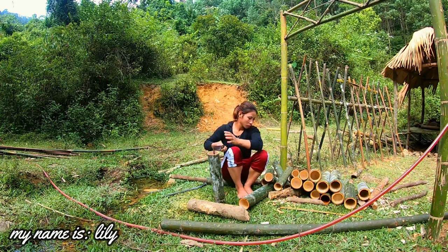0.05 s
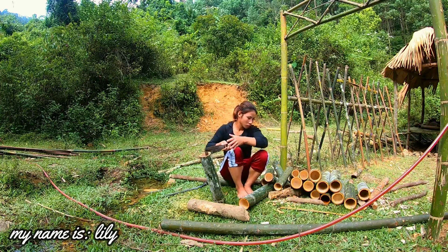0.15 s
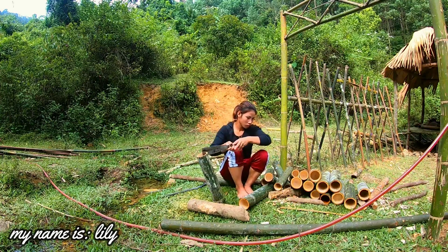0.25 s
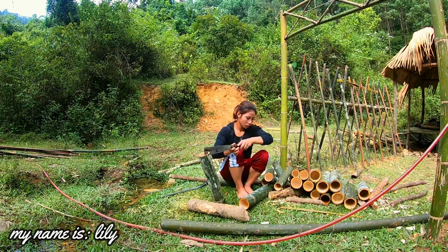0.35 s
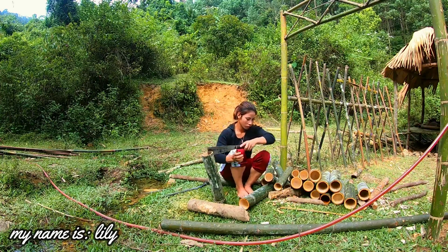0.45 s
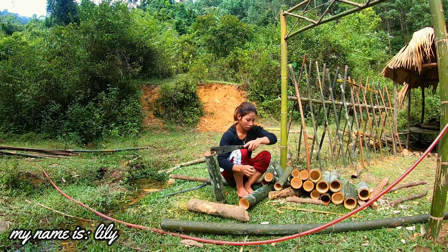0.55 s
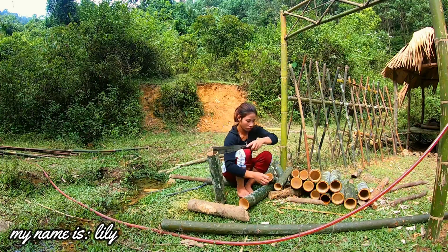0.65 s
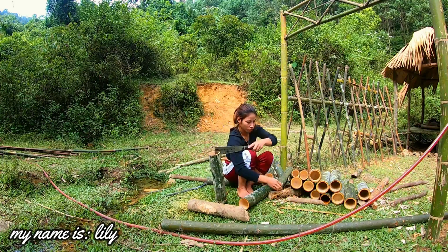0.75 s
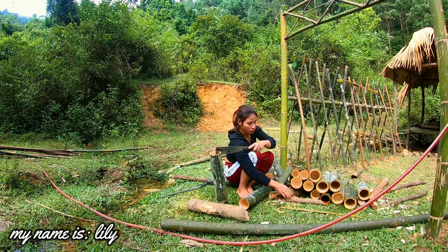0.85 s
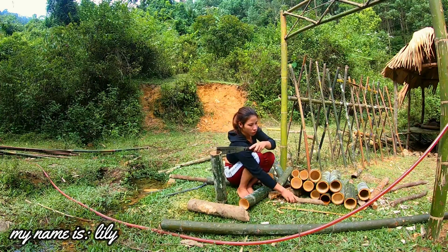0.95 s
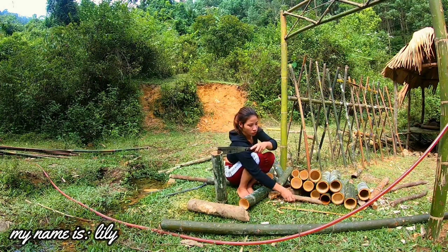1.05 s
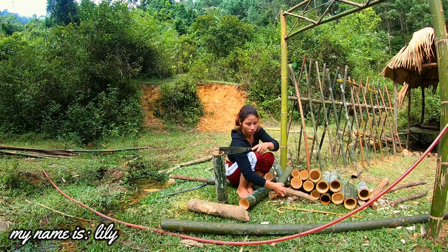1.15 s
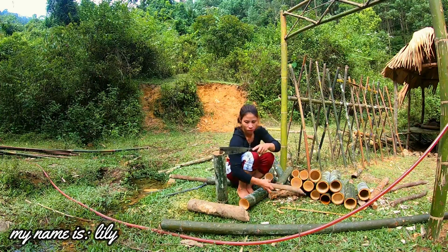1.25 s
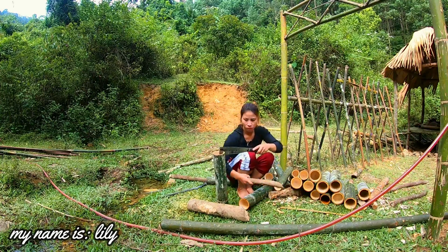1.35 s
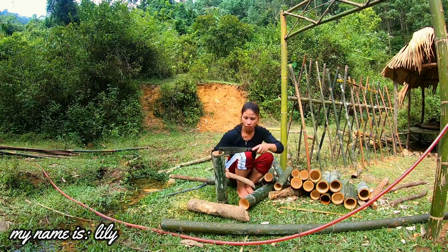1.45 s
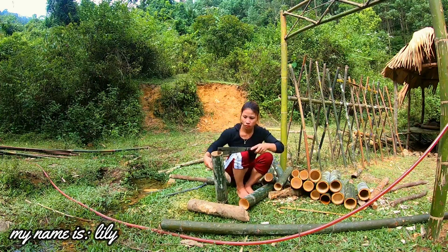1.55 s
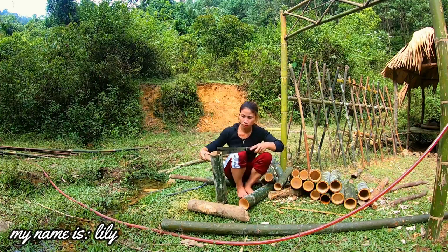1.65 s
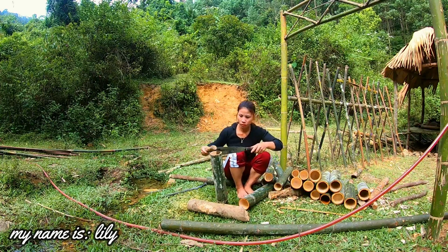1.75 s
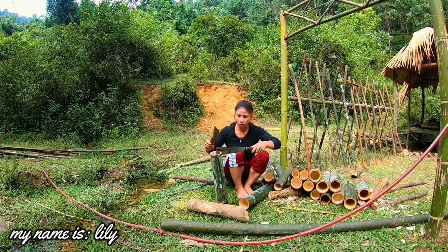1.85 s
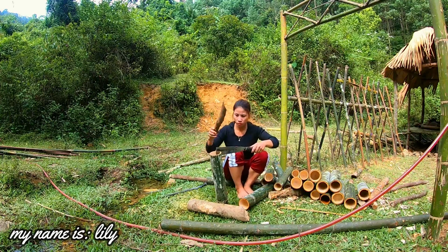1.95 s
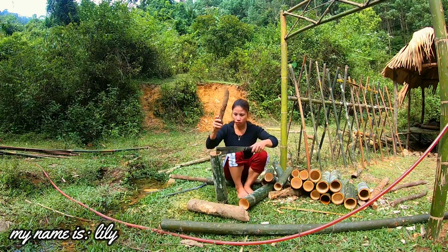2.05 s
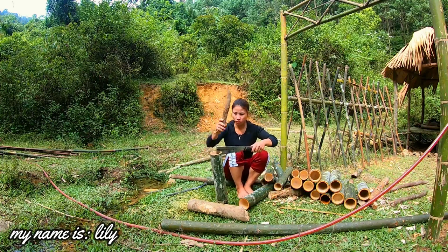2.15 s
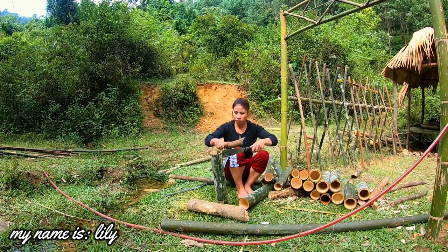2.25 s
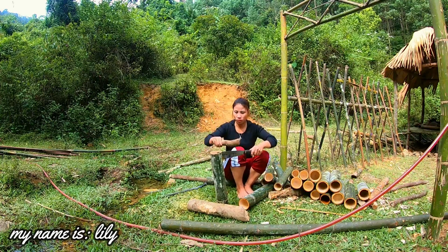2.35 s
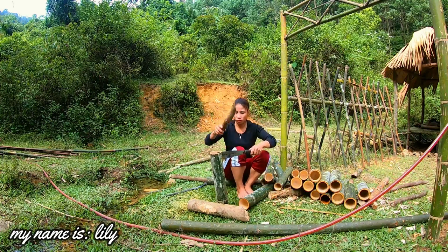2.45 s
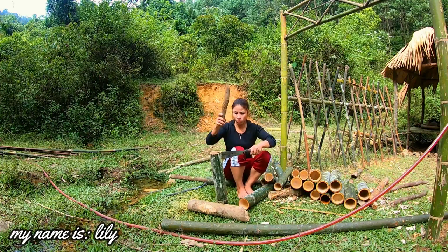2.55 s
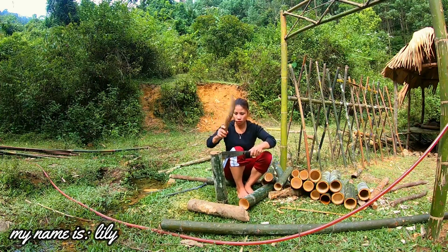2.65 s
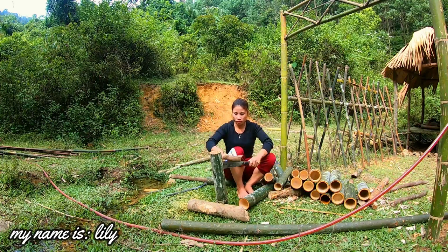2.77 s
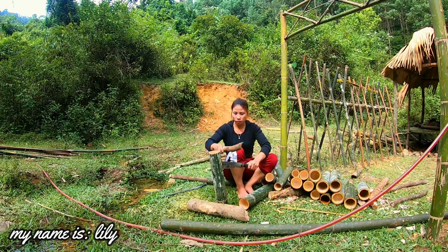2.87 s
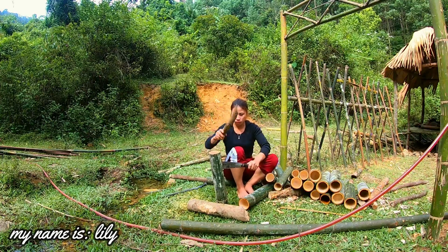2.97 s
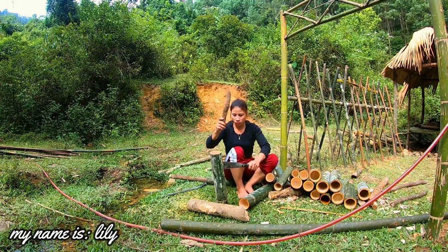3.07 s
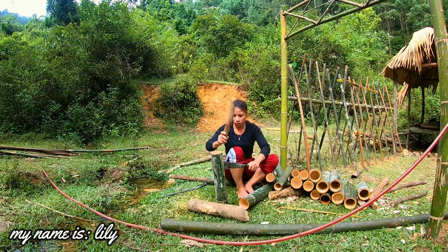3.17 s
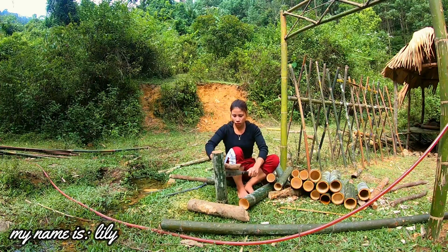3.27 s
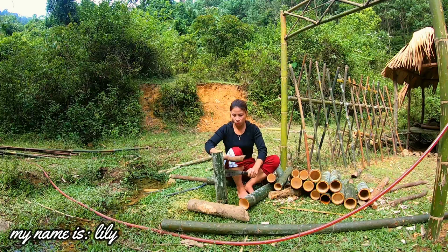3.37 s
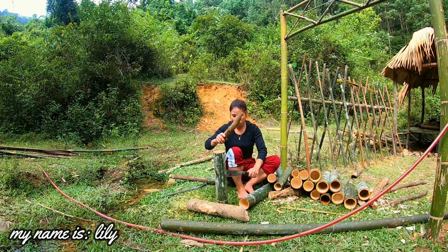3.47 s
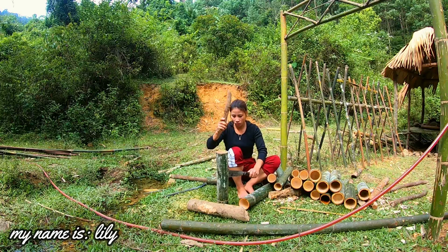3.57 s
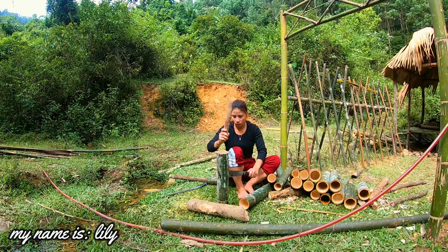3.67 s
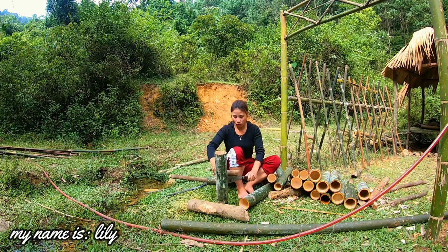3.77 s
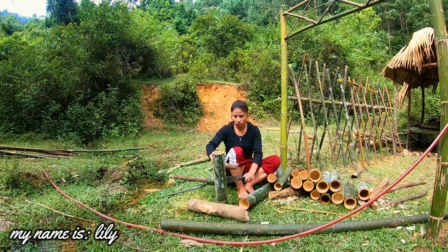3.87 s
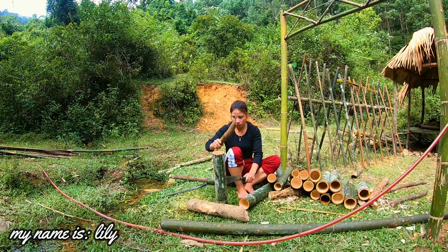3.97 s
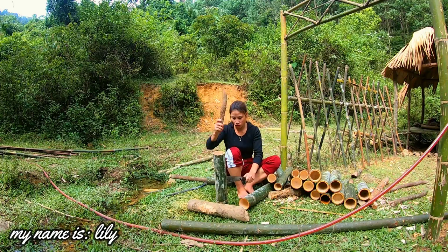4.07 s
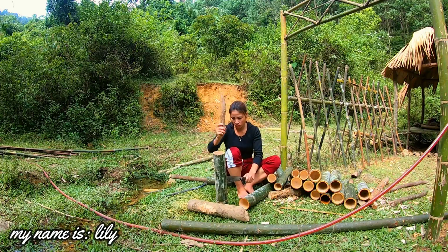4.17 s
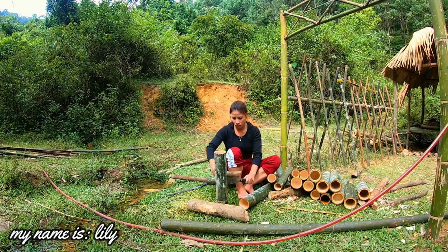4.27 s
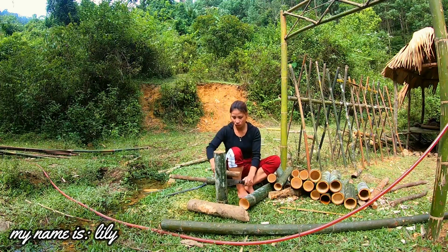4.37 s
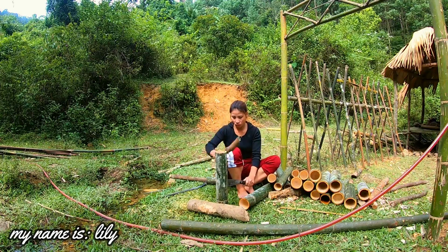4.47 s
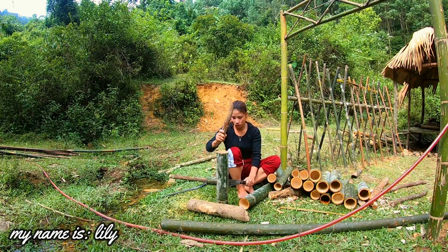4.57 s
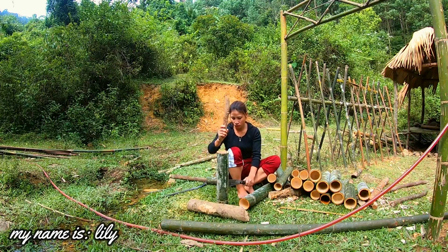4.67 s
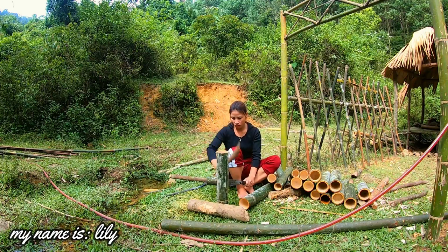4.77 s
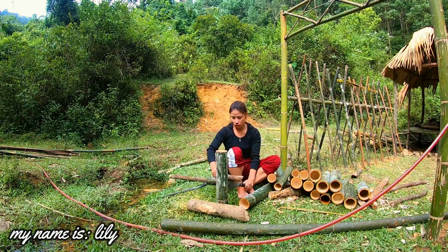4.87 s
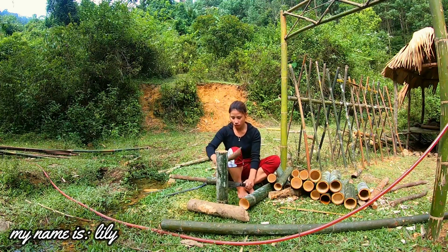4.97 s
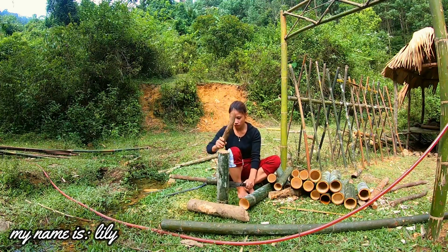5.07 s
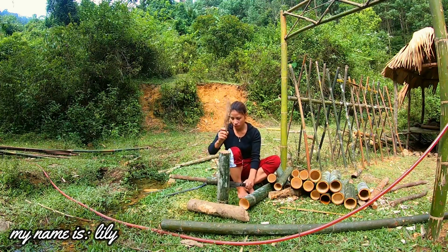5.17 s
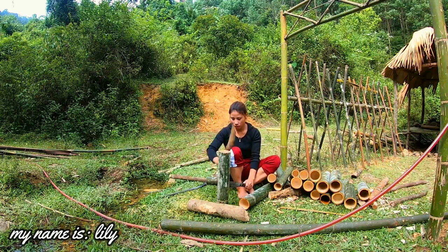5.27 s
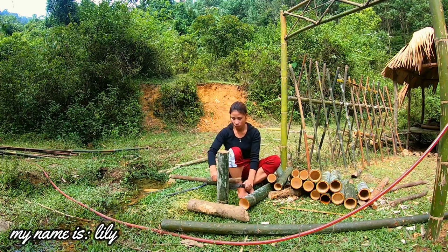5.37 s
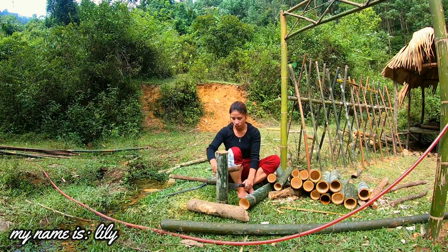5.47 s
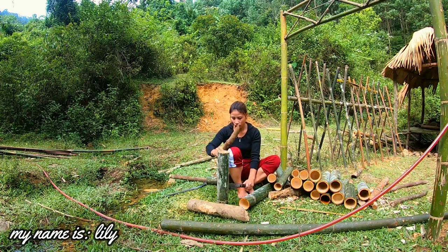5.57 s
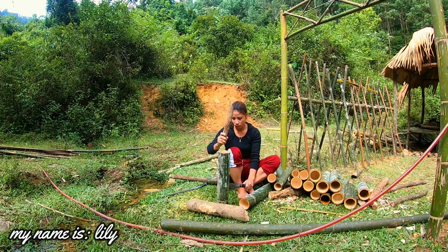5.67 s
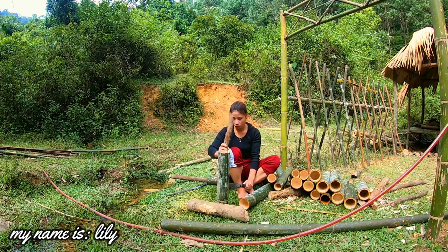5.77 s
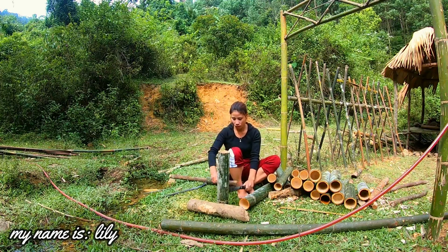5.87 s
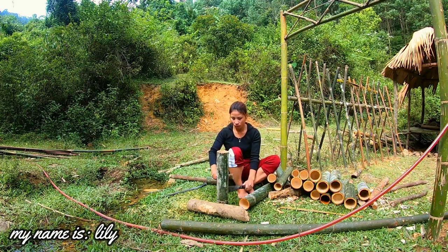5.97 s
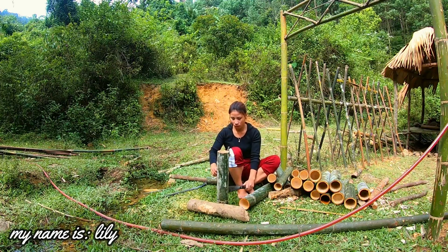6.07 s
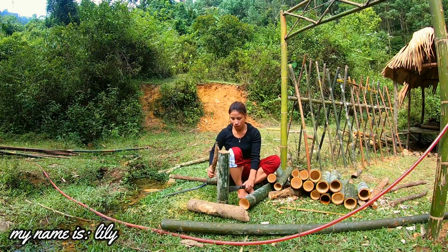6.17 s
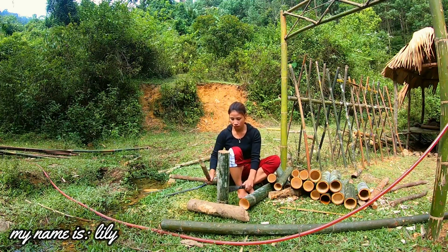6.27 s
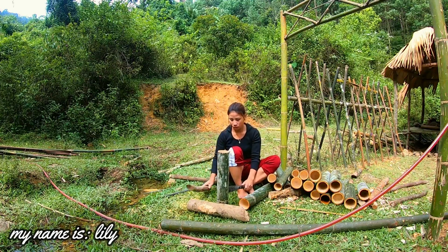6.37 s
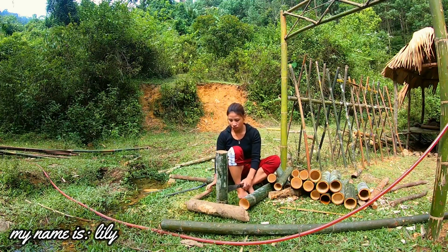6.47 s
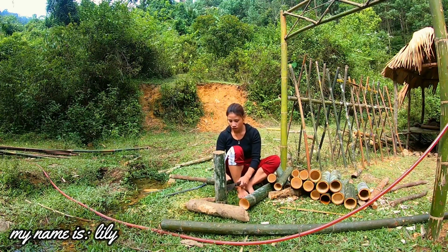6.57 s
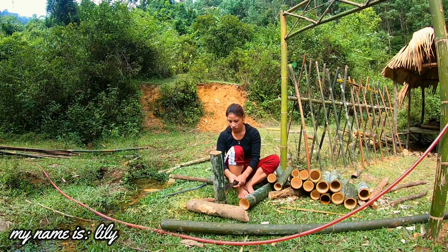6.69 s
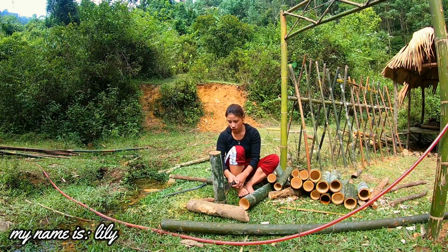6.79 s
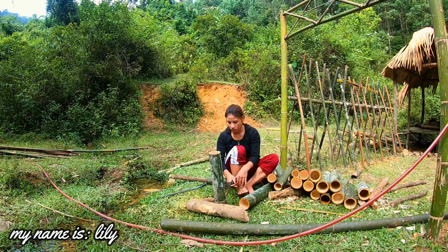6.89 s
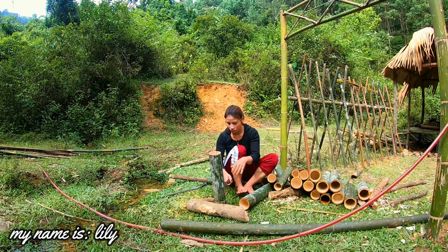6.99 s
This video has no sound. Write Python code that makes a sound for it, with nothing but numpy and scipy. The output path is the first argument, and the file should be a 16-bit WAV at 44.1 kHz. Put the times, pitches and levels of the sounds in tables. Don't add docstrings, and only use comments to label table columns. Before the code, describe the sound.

After two seconds of gurgling water and cricket trill, eight evenly spaced woody whacks split a bamboo tube in a clearing.

```python
import sys
import numpy as np
from scipy import signal
from scipy.io import wavfile
from scipy.ndimage import uniform_filter1d

SR = 44100
rng = np.random.default_rng(int(sys.argv[2]) if len(sys.argv) > 2 else 0)


def generate_wav(signal):
    frames = np.transpose(np.atleast_2d(signal))
    scaled = np.clip(frames, -1, 1) * 32767
    pcm = np.round(scaled).astype(np.int16)
    wavfile.write(sys.argv[1], SR, pcm)


def boost_factor(decibels):
    exponent = np.asarray(decibels, float) / 20
    return 10 ** exponent


N = 310023

# (frequency [Hz], density [dB per Hz])
WATER_SPECTRUM = [(25, -38), (110, -12.5), (185, 3), (320, -2.5), (470, -8), (600, -7.5), (960, -8.5),
                  (1840, -3.5), (3200, -10.5), (5000, -12), (6500, -13), (9000, -16), (11500, -10),
                  (16000, -49)]
# (time [s], level [dB])
FLOW_LEVEL = [
    (0, -1.5),
    (2.3, -0.5),
    (3, 0.9),
    (5.2, 0.4),
    (6, -2.1),
    (6.5, 1.3),
    (7.03, -0.6),
]
# (frequency [Hz], left-right likeness [-1..1])
WATER_LIKENESS = [(60, -0.22), (130, 0.91), (290, 0.91), (640, 0.031), (1410, -0.21), (3100, 0.4),
                  (6820, -0.062), (15000, -0.92)]
# (frequency [Hz], left-right [dB])
WATER_LEAN = [(60, -9), (150, 0), (380, -1.5), (950, 2.5), (2380, -3.5), (5980, -0.5), (15000, -2)]
# (time [s], peak [dB], pitch [Hz])
DRIPS = [(0.047, -25.5, 3170), (0.279, -27.5, 2800), (0.559, -23.5, 1830), (0.62, -30, 1670),
         (0.773, -28.5, 2600), (0.858, -29, 2700), (1.144, -26, 1100), (1.195, -28, 1930),
         (1.258, -21.5, 2750), (1.547, -24.5, 1160), (1.676, -31, 2140), (2.251, -20.5, 2680),
         (2.286, -26, 2740), (2.317, -27.5, 1820), (2.58, -27.5, 1070), (2.75, -23, 2630),
         (3.134, -33, 1720), (3.67, -31, 1870), (4.244, -29, 2410), (4.662, -29, 2500),
         (4.782, -19.5, 1190), (5.196, -22, 2800), (5.78, -26.5, 2680), (5.875, -29, 1600),
         (6.255, -33, 2430), (6.445, -29, 1530), (6.611, -27.5, 1830), (6.688, -27, 2230),
         (6.897, -26.5, 1150), (7.011, -27, 1950)]
# (time [s], peak [dB], pitch [Hz])
GULPS = [(0.377, -20.5, 165), (0.438, -20.5, 168), (0.558, -17.5, 330), (0.613, -22.5, 205),
         (1.064, -22, 560), (1.514, -17.5, 200), (1.736, -17, 297), (1.906, -22.5, 259),
         (1.963, -16.5, 325), (2.278, -21, 277), (3.07, -18.5, 194), (4.993, -12, 330), (5.278, -12.5, 286),
         (5.335, -13.5, 320), (5.873, -22, 339), (5.916, -19, 186), (6.191, -24, 195.2),
         (6.298, -21.5, 287), (6.398, -26, 330), (6.685, -16, 278), (6.954, -20, 230)]
# (lowest pitch [Hz], left-right [dB])
DRIP_SPOTS = [
    (0, 4),
    (1350, -12.5),
    (2530, 2.5),
]
WATER_DB = -34

# (start [s], end [s], first level [dB], last level [dB], flat while cold [Hz])
NEAR_SONG = [
    (-.05, .085, -38.5, -40, 0),
    (.58, 4.64, -39.5, -39, 200),
    (5.12, 5.46, -41, -38, 200),
    (5.56, 7.1, -42, -36.5, 0),
]
# (start [s], end [s], first level [dB], last level [dB], flat while cold [Hz])
FAR_SONG = [
    (1.05, 1.35, -46, -46, 0),
    (1.7, 3.9, -49, -52, 0),
    (4.0, 4.45, -45, -37, 0),
    (4.97, 5.88, -38, -45, 0),
    (6.46, 7.1, -40, -37.5, 0),
]
# (start [s], length [s], level [dB], flat [Hz])
NEAR_STROKES = [(-.003, 0.022, -1.5, 33), (.012, 0.0075, -2.5, 134), (.018, .011, -7, 7),
                (.03, 0.008, -10.5, 11)]
FAR_STROKES = [(0, 0.0079, -8.5, -16), (.013, 0.016, -9, 3), (.026, .009, -12.5, 25.5)]
NEAR_FIRST_S, NEAR_PERIOD_S, NEAR_HZ = .0475, .04989, 6440
FAR_FIRST_S, FAR_PERIOD_S, FAR_HZ = .023, .0485, 4820
WARM_UP_S, WARM_SAG, WARM_DB, EDGE_S, REST_DB = .165, .5, -3.5, 0.018, -62

# (time [s], peak [dB], centre [Hz], length [ms], left-right [dB])
TICKS = [(0.047, -29, 3520, 4.1, 0), (.195, -28, 8000, 2.5, -9), (0.62, -28, 6970, 11, -12),
         (3.843, -25.5, 2580, 2.3, -11), (0.557, -31, 2380, 3.4, -5), (4.52, -38, 6000, 33, 14),
         (5.19, -24, 8750, 1.6, -4), (5.298, -26, 6000, 1.8, -4), (5.51, -29, 7000, 81, 5),
         (5.515, -32, 2580, 180, 7), (6.551, -20.5, 85, 21, 2), (2.38, -14, 60, 25, 0),
         (3.885, -11, 75, 19.6, 1), (4.411, -10, 70.6, 22, 0), (4.927, -10.5, 70, 30, 2),
         (6.686, -31, 2600, 3.7, -11), (6.73, -24.5, 111, 20, -0.5)]

# (frequency [Hz], width [Hz], level [dB])
TUBE_MODES = [(528, 79, -13), (730, 200, -1), (1100, 206, 4), (1267, 144, -1.5), (1640, 310, -2.5),
              (1920, 350, -0.5), (2140, 400, -1.5)]
# (frequency [Hz], width [Hz], level [dB])
BLADE_MODES = [(2795, 407, 9.5), (3170, 164, 1), (3356, 220, 3), (3810, 280, 2.5), (4640, 560, 3),
               (5460, 630, 2), (6320, 1080, 5)]
# (frequency [Hz], left-right [dB])
BLOW_LEAN = [(60, .5), (400, .5), (700, -.5), (1300, -3), (2400, -2.5), (4400, -1), (9000, -1.5)]
# (time [s], snap [dB], wall [dB], crack [Hz], crack [dB])
SPLIT = [
    (2.378, 8, -10, 2890, -7.5),
    (2.84, 5.5, -9, 2730, -9),
    (3.362, -2, -13, 2560, -2.5),
    (3.878, 4, -24, 2210, -1),
    (4.403, 3, -0.5, 3630, -5),
    (4.925, 7, -1, 3500, 5.5),
    (5.445, 2, -36, 1950, -8),
    (5.988, 1, -40, 2640, 4),
]
# (time [s], knock [dB], blade [dB], hollow note [Hz], hollow note [dB])
STRIKES = [
    (2.378, -8.5, -15, 680, -5.5),
    (2.840, -1, -12, 1100, -13),
    (2.862, -17, -12.5, 1100, -10),
    (3.3623, -6, -16, 1024, -6),
    (3.878, -4.5, -13.5, 1049, -7.5),
    (4.404, -13.5, -10, 1260, -10.5),
    (4.9253, -3, -7.5, 1330, -2),
    (5.4449, -17, -8.5, 897, -12.5),
    (5.453, -9, -11.5, 414, -5),
    (5.988, -9, -11, 1187, -11),
]
# (time [s], knock [dB], hollow note [Hz], hollow note [dB])
REBOUNDS = [(2.372, -37, 710, -29), (2.393, -15.5, 698, -7.5), (2.4025, -18, 697, -3),
            (2.416, -24, 695, -16), (2.847, -12.5, 703, 2.5), (2.870, -13.5, 722, 1.5),
            (3.381, -19.5, 773, -10.5), (3.394, -24, 308, -18), (3.886, -16, 1060, -8),
            (3.896, -19, 329, -6), (4.4096, -19, 730, -4), (4.426, -32, 339, -12), (4.932, -9, 352, -7),
            (4.952, -38, 323, -28), (5.991, -20, 414, -10.5), (6.010, -13, 394, -5)]
HOLLOW_CYCLES, THUMP_HZ, THUMP_DB, SPLIT_WALL_HZ = 23.4, 167, -13, 1560
WORK_START_S, TEAR_MS, TEAR_LOSS_MS_PER_S, REBOUND_TEAR_MS = 2.38, 8, 1.39, 10.7
REBOUND_BLADE_DB, WEDGE_DB_PER_S = -6, 6.5
GRAZE_LEAD_S, GRAZE_DB, GRAZE_HZ, GRAZE_MS = .012, -24, 850, 12
ECHO_DB, ECHO_T60_S, HILL_S, HILL_DB = -27.5, 0.29, 0.11, -14.5

MIC_LOW_HZ, MIC_HIGH_HZ, MIC_UNDER_DB, MIC_OVER_DB = 140, 9830, -16.5, -23
HISS_DB, RUMBLE_DB = -76.5, -74


def rms_one(x):
    return x / np.sqrt(np.mean(x ** 2) + 1e-20)


def in_time(rows):
    s, *columns = np.transpose(rows)
    return [np.interp(np.arange(N) / SR, s, c) for c in columns]


def at_hz(points, hz):
    table_hz, value = np.array(points).T[:2]
    return np.interp(np.log(hz), np.log(table_hz), value)


def sides(lean_db):
    return boost_factor(np.array([[.5], [-.5]]) * lean_db)


def band(x, low_hz, high_hz, order=2):
    return signal.sosfilt(signal.butter(order, [low_hz, high_hz], "band", fs=SR, output="sos"), x)


def drift(rate):
    r = np.exp(-80 * np.pi * rate / SR)
    slow = signal.lfilter([1], [1, -2 * r, r * r], rng.standard_normal(N // 40 + 2002))[2000:]
    return np.interp(np.arange(N) / 40, np.arange(len(slow)), rms_one(slow))


def add(out, sound, s):
    i = round(s * SR)
    out[..., i:i + sound.shape[-1]] += sound[..., :N - i]


def ring(force, hz, t60):
    r, w = boost_factor(-60 / (t60 * SR)), 2 * np.pi * hz / SR
    return signal.lfilter([0, np.sin(w)], [1, -2 * r * np.cos(w), r * r], force + 1e-18)


def bubble(hz, cycles, rise):
    turns = np.arange(int(3 * cycles * SR / hz)) * hz / SR
    age = turns / cycles
    return np.sin(2 * np.pi * turns * (1 + rise * age)) * np.exp(1 - 3 * age) * 3 * age


def burst(noise, hz, ms, octaves):
    t = np.arange(len(noise)) / SR
    low_hz, high_hz = np.clip(hz * 2 ** (np.array([-.5, .5]) * octaves), 20, .45 * SR)
    shape = np.exp(-(t * 1000 / ms) ** 2) * (1 - np.exp(-t * 5000 / ms))
    puff = band(noise * shape, low_hz, high_hz)
    return puff / np.abs(puff).max()


def self_noise():
    hiss = band(rng.standard_normal((2, N)), 10800, 15200, order=4)
    rumble = band(rng.standard_normal(N), 35, 110, order=1)
    return boost_factor(HISS_DB) * rms_one(hiss) + boost_factor(RUMBLE_DB + 6.1 * drift(7.2)) * rms_one(rumble)


def wash(patchy_db, splash_db):
    out, slow, splash = 0, drift(1.8), drift(48)
    edges_hz = 22 * 2 ** np.arange(0, 9.7, 1 / 3)
    white = rng.standard_normal((2, 2, N))
    for k, (low_hz, high_hz) in enumerate(zip(edges_hz, edges_hz[1:])):
        mid, side = band(white[k % 2], low_hz, high_hz)
        hz = np.sqrt(low_hz * high_hz)
        alike = np.clip(at_hz(WATER_LIKENESS, hz), -.99, .99)
        stereo = np.sqrt(1 + alike) * mid + np.sqrt(1 - alike) * side * [[1], [-1]]
        lively = 1 / (1 + (hz / 3500) ** 2)
        flicker_db = lively * (splash_db * splash + patchy_db * drift(43))
        gain = boost_factor(at_hz(WATER_SPECTRUM, hz) + 0.66 * slow + flicker_db)
        out = out + gain * sides(at_hz(WATER_LEAN, hz)) * stereo
    return rms_one(out)


def babble(per_s, low_hz, high_hz, cycles, spread_db, lean_db):
    count = int(per_s * N / SR)
    out, draws = np.zeros((2, N)), rng.random((4000, 4))[:count]
    for when, size, strength, place in draws:
        hz = low_hz * (high_hz / low_hz) ** size
        level = boost_factor(-spread_db * np.log(strength + 0.048))
        gains = sides(lean_db * (1 + 4 * (place - .5)))
        add(out, level * bubble(hz, cycles, rise=.04) * gains, when * N / SR * .999)
    return rms_one(out)


def slaps(per_s, spread_db):
    out, count = np.zeros((2, N)), int(per_s * N / SR)
    draws, noises = rng.random((600, 4))[:count], rng.standard_normal((600, 600))[:count]
    for (when, size, strength, depth), noise in zip(draws, noises):
        level, s = boost_factor(-spread_db * np.log(strength + .02)), when * N / SR * .999
        add(out, level * burst(noise, 1500 + 1300 * size, 3.5, octaves=1.2) * sides(-8.0), s)
        plop = bubble(170 + 200 * depth, cycles=2.4, rise=0.016)
        add(out, level * boost_factor(-14.0) * plop, s + 0.002)
    return rms_one(out)


def water():
    out = boost_factor(WATER_DB - 2.0) * wash(patchy_db=2.0, splash_db=2.0)
    out += boost_factor(-44.0) * babble(130, low_hz=151.8, high_hz=405.4, cycles=7.4, spread_db=5.5, lean_db=1.4)
    out += boost_factor(-46) * babble(330, low_hz=493.4, high_hz=3570, cycles=9.8, spread_db=2.5, lean_db=-4.0)
    out += boost_factor(-50) * slaps(per_s=70, spread_db=2.2)
    out *= boost_factor(in_time(FLOW_LEVEL)[0])
    for (s, db, hz), noise in zip(DRIPS, rng.standard_normal((len(DRIPS), 600))):
        lean_db = [lean for lowest_hz, lean in DRIP_SPOTS if hz > lowest_hz][-1]
        add(out, boost_factor(db - 4.5) * bubble(hz, cycles=9.9, rise=0.0054) * sides(lean_db), s)
        splat_db = db - 1.0 - 2.9 * max(lean_db + 20.0, 0)
        add(out, boost_factor(splat_db) * burst(noise, hz, 4.0, octaves=1.4) * sides(lean_db), s)
    for s, db, hz in GULPS:
        add(out, boost_factor(db - 10.0) * bubble(hz, cycles=3.05, rise=0.0072), s)
    return out


def phrases(rows):
    t, under_hz, gain = np.arange(N) / SR, np.zeros(N), boost_factor(REST_DB)
    for start, end, first_db, last_db, flat_hz in rows:
        warm = (t - start) / WARM_UP_S
        cold = (warm > -.5) & (warm < 1) & (flat_hz > 50)
        under_hz = under_hz + cold * flat_hz * (1 - WARM_SAG * np.clip(warm, 0, 1) ** 2)
        edge = np.clip(np.minimum(t - start, end - t) / EDGE_S + .5, 0, 1)
        level_db = np.interp(t, [start, end], [first_db, last_db]) + WARM_DB * cold
        gain = gain + edge * boost_factor(level_db)
    return under_hz, gain


def cricket(song, full_hz, first_s, period_s, strokes, lean_db, lag_turns):
    under_hz, gain = phrases(song)
    since = (np.arange(N) / SR - first_s + .004) % period_s - .004
    turns = np.cumsum((full_hz - under_hz) * (1 + .0045 * drift(90))) / SR
    turns = turns + np.array([[0], [lag_turns]])
    out = 0
    for start, length, db, flat_hz in strokes:
        phase = np.clip((since - start) / length, 0, 1)
        shape = np.sqrt(np.clip(np.sin(np.pi * phase), 0, 1))
        tone = np.sin(2 * np.pi * (turns - flat_hz * since))
        out = out + boost_factor(db + 2.0 * drift(11)) * shape * tone
    return out * gain * boost_factor(5 + drift(200)) * sides(lean_db)


def ticks():
    out = np.zeros((2, N))
    for (s, db, hz, ms, lean_db), noise in zip(TICKS, rng.standard_normal((len(TICKS), 8000))):
        add(out, boost_factor(db) * burst(noise, hz, ms, octaves=1.8) * sides(lean_db), s)
    return out


def clearing(x):
    t = np.arange(round(.4 * SR)) / SR
    near = boost_factor(-60 * t / ECHO_T60_S) * (1 - np.exp(-t / 0.0034))
    hill = boost_factor(HILL_DB) * np.exp(-((t - HILL_S) / 0.058) ** 2)
    scatter = band(rng.standard_normal((2, len(t))) * (near + hill), 1200, 8000)
    return boost_factor(ECHO_DB - 17.5) * signal.fftconvolve(x, scatter, axes=1)[:, :N]


def contacts():
    rows = []
    for s, knock_db, blade_db, hz, hollow_db in STRIKES:
        tear_ms = TEAR_MS - TEAR_LOSS_MS_PER_S * (s - WORK_START_S)
        rows.append((s, knock_db, tear_ms, hz, hollow_db, blade_db))
    for s, knock_db, hz, hollow_db in REBOUNDS:
        blade_db = knock_db + REBOUND_BLADE_DB - WEDGE_DB_PER_S * (s - WORK_START_S)
        rows.append((s, knock_db, REBOUND_TEAR_MS, hz, hollow_db, blade_db))
    return sorted(rows)


def body(force, modes, luck, scatter_db):
    out = 0
    for k, (hz, width_hz, db) in enumerate(modes):
        rung = ring(force, hz, 1.88 / width_hz) * boost_factor(db + scatter_db * luck[k]) * (-1) ** k
        out = out + rung * sides(at_hz(BLOW_LEAN, hz) + 6.1 * luck[-1 - k] * hz / (hz + 2500))
    return out


def tearing(t, noise, tear_ms):
    shape = np.exp(-(t / (tear_ms / 1000)) ** 2) + boost_factor(-12.5) * np.exp(-t / 0.018)
    fibres = noise * np.abs(noise) ** 0.65 * shape * (1 - np.exp(-t / 0.00043))
    return fibres + boost_factor(12.5) * np.exp(-((t - .0006) / .00007) ** 2)


def hollow_note(push, hz, db):
    t60 = HOLLOW_CYCLES / hz ** 0.75 / 2.2
    upper_db = -6.5 - 3.0 * (hz > 600)
    return (ring(push, hz, t60) + boost_factor(upper_db) * ring(push, 1.24 * hz, 0.88 * t60)) * boost_factor(db)


def blows():
    out, t = np.zeros((2, N)), np.arange(round(.25 * SR)) / SR
    rows = contacts()
    draws = rng.standard_normal((len(rows), 2, len(t)))
    for (s, knock_db, tear_ms, hollow_hz, hollow_db, blade_db), (noise, luck) in zip(rows, draws):
        _, snap_db, wall_db, crack_hz, crack_db = min(SPLIT, key=lambda row: abs(row[0] - s))
        fibres = tearing(t, noise, tear_ms)
        push = np.exp(-((t - .0008) * hollow_hz * 5.4) ** 2) * hollow_hz / SR * 3.56
        hollow = hollow_note(push, hollow_hz, hollow_db)
        thump = ring(push, THUMP_HZ, 0.03) * boost_factor(knock_db + THUMP_DB)
        snap = band(fibres, 2500, 9000, order=1)
        snap = np.array([snap, np.roll(snap, shift=3)])
        snap = snap * boost_factor(blade_db + snap_db - 10) * sides(-0.79)
        wall_modes = TUBE_MODES + [(SPLIT_WALL_HZ, 350, wall_db + 7.0)]
        wall = body(fibres, wall_modes, luck, scatter_db=5.0) * boost_factor(knock_db - 23)
        blade_modes = [(crack_hz, 300, crack_db + 11.5)] + BLADE_MODES
        blade = body(fibres, blade_modes, luck[40:80], scatter_db=2.9) * boost_factor(blade_db - 21.5)
        add(out, wall + blade + snap + hollow * sides(at_hz(BLOW_LEAN, hollow_hz)) + thump, s)
        add(out, boost_factor(-27) * (wall + .5 * blade + hollow)[:, 700:0:-1], s - 700 / SR)
    for (s, *_), (_, luck) in zip(SPLIT, draws):
        graze = burst(luck[1000:2500], GRAZE_HZ, GRAZE_MS, octaves=1.3)
        add(out, boost_factor(GRAZE_DB) * graze, s - GRAZE_LEAD_S)
    return out


def scene():
    hits = blows()
    near = cricket(NEAR_SONG, NEAR_HZ, NEAR_FIRST_S, NEAR_PERIOD_S, NEAR_STROKES, lean_db=-6.0, lag_turns=-0.3)
    far = cricket(FAR_SONG, FAR_HZ, FAR_FIRST_S, FAR_PERIOD_S, FAR_STROKES, lean_db=-11.5, lag_turns=0.37)
    return hits + clearing(hits) + water() + ticks() + near + far


def held(db, release_db_per_s):
    ramp = release_db_per_s * np.arange(N) / SR
    return np.maximum.accumulate(db + ramp) - ramp


def low_pass(x):
    return signal.sosfilt(signal.butter(12, 16470, fs=SR, output="sos"), x)


def record(dry):
    low_cut = signal.butter(4, MIC_LOW_HZ, fs=SR, output="sos")
    dry = dry + boost_factor(MIC_UNDER_DB) * dry - signal.sosfiltfilt(low_cut, dry)
    high_cut = signal.butter(14, MIC_HIGH_HZ, fs=SR, output="sos")
    dry = boost_factor(MIC_OVER_DB) * dry + signal.sosfiltfilt(high_cut, dry)
    over_db = 20 * np.log10(uniform_filter1d(np.abs(dry).max(axis=0), size=200) + 1e-6) + 22
    duck_db = held(np.clip(over_db, 0, 7.0), release_db_per_s=5.0)
    duck_db = duck_db + held(np.clip(over_db, 0, 4.0), release_db_per_s=108)
    r = np.exp(-1 / (0.022 * SR))
    x = (dry + self_noise()) * boost_factor(-signal.lfilter([1 - r], [1, -r], duck_db))
    return low_pass(1.086 * np.tanh(x / 1.108))


dry = scene()
out = record(dry)
generate_wav(out)
```